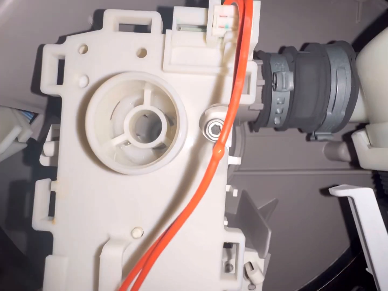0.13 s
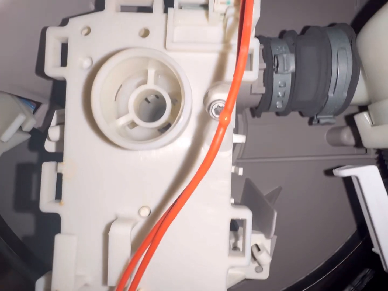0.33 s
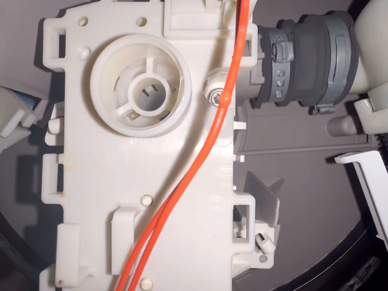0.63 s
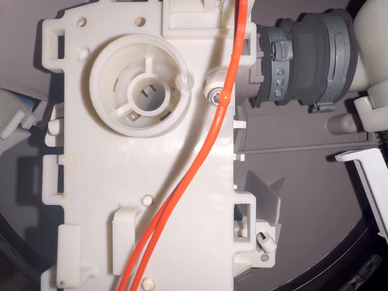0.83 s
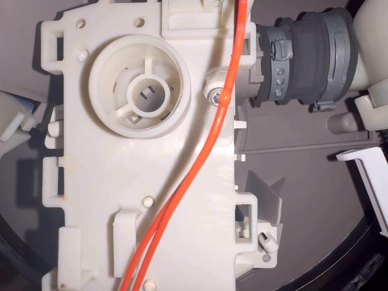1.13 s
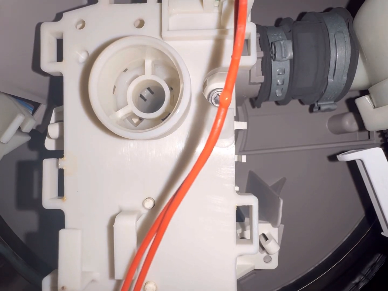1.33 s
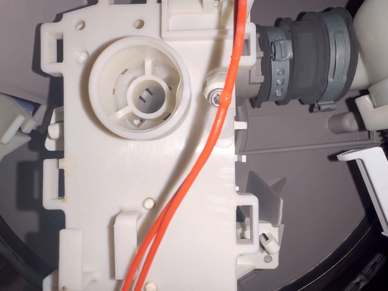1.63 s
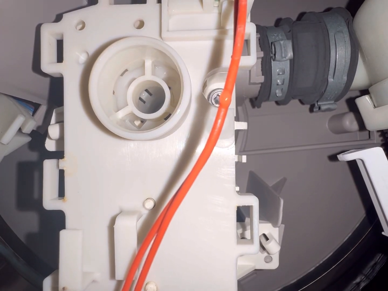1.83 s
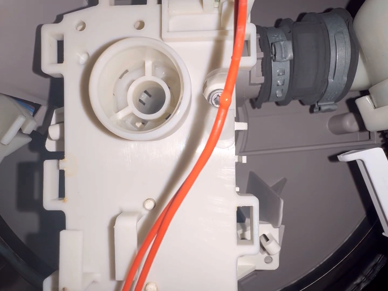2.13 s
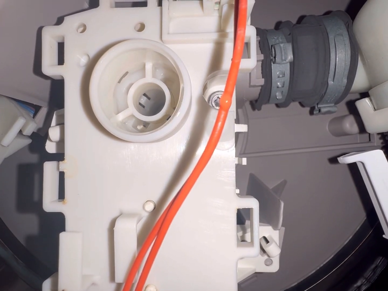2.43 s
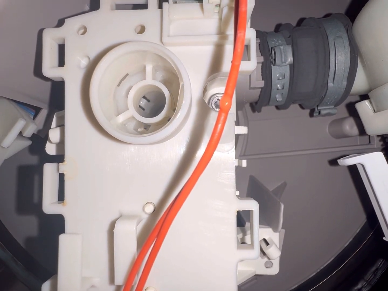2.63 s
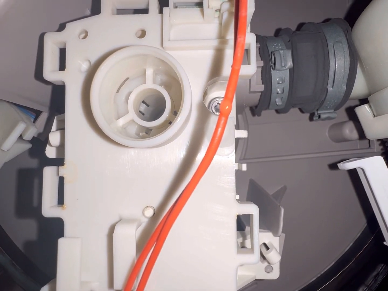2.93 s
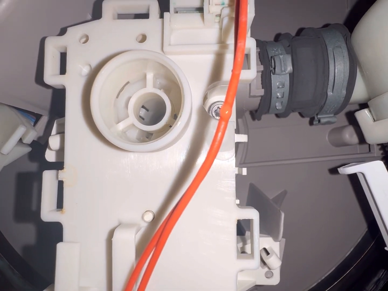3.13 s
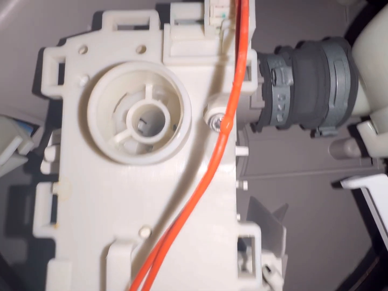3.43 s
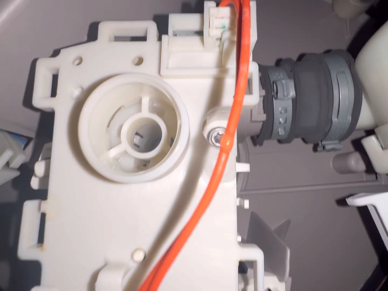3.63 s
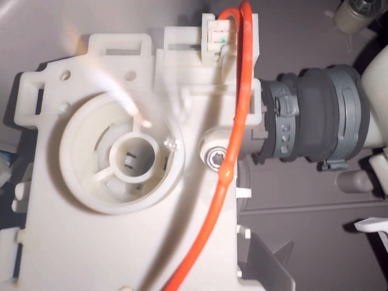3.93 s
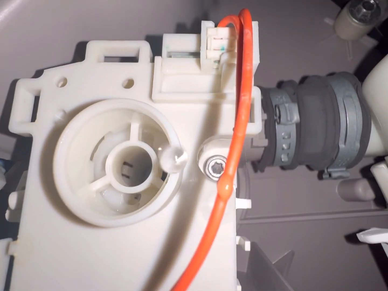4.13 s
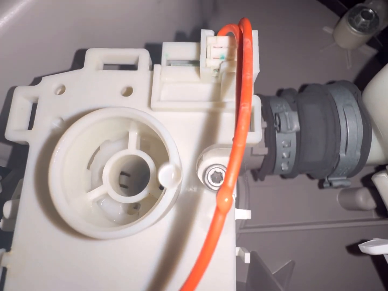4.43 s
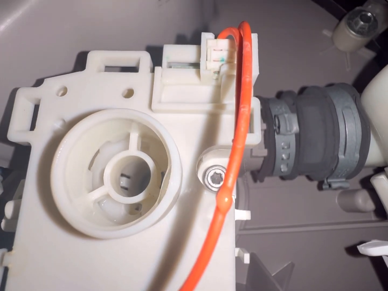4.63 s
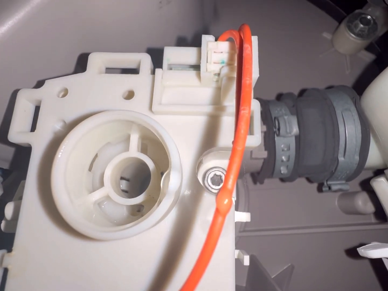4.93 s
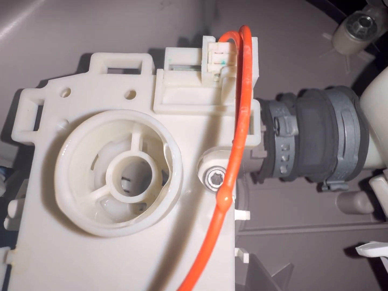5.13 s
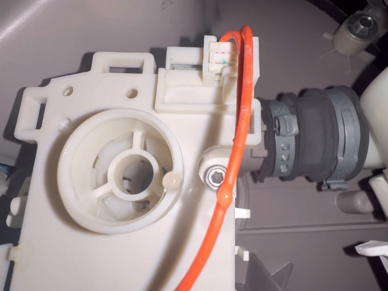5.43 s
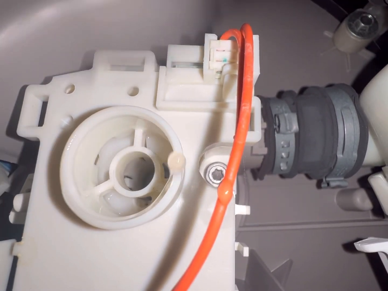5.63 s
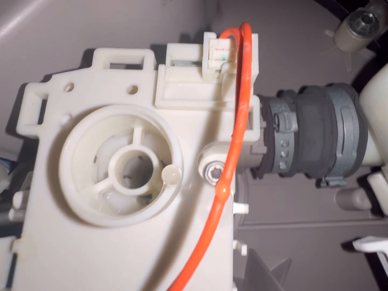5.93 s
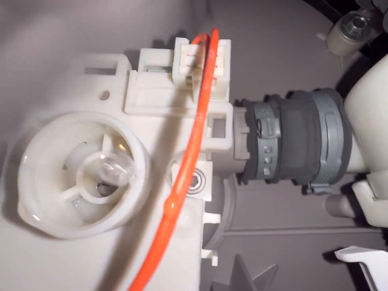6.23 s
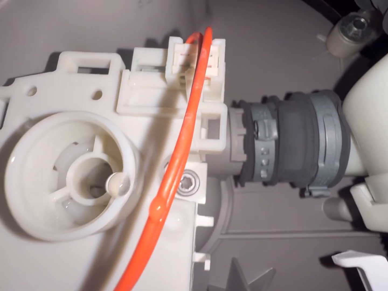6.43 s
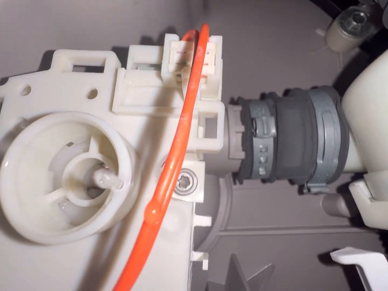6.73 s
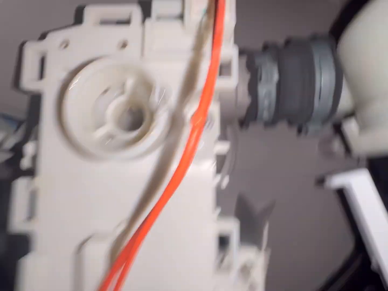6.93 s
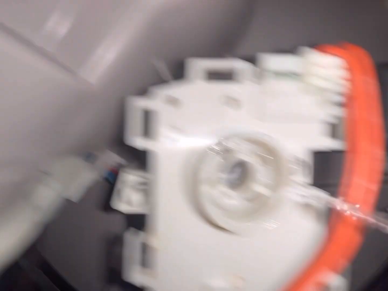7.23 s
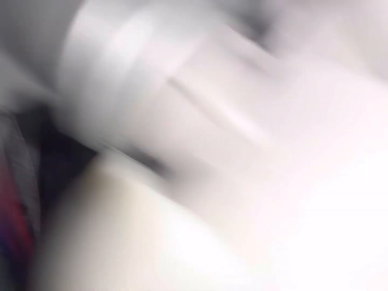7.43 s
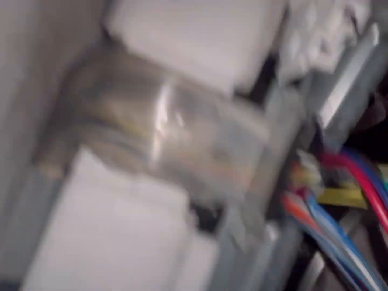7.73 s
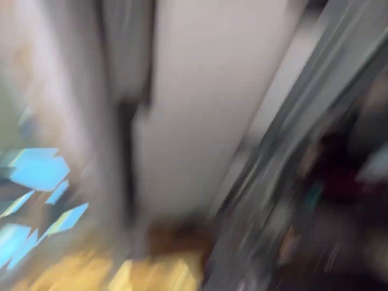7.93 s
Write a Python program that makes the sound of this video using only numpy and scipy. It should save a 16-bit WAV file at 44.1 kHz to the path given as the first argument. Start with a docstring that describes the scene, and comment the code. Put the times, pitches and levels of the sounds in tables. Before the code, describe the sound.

Very close under a dishwasher, in stereo with the right side louder and brighter. From 0 s a pump drones low, chirping and ticking about 47 times a second so it blurs into a rough buzz, with a grinding hiss, rumbling, gurgling water and a thin whistle around 5 kHz. At 1.84 s a drop strikes the phone with a hard ring and low thump, a small gurgle and plink following; another cracks at 2.93 s, dulling the buzz, with light plastic ticks to 3.5 s. The deep churning eases around 3.2-3.9 s, then returns. From 5.77 to 6.85 s drops pelt the microphone in clusters of heavy thumps, wet rings and sharp cracks, making the machine dip and recover. From about 7 s the phone slides out: a bump, gritty rubs, bright scrapes, rasps and ticks until 7.95 s, while the machine fades.

```python
"""Under a running dishwasher, with a phone as the stereo microphone; its right port hears the machine earlier.
The pump hums on multiples of its shaft speed and chirps once a turn; water is filtered noise, patchy in level.
A leaking valve drips onto the phone right beside the ports: rings, thumps and cracks that make the limiter
duck the machine, with gurgles of sliding noise. At the end the phone is pulled out, with grains of friction,
rasps, ticks and knocks, while the machine fades."""
import sys
import numpy as np
from scipy import signal
from scipy.fft import rfft, irfft, next_fast_len
from scipy.io import wavfile
from scipy.ndimage import uniform_filter1d, minimum_filter1d, map_coordinates

SR = 44100
rng = np.random.default_rng(int(sys.argv[2]) if len(sys.argv) > 2 else 0)


def bounce(signal):
    """Save signal as a 16-bit WAV file at the path given by the first command-line argument."""
    frames = np.transpose(np.atleast_2d(signal))
    limited = np.clip(frames, -1, 1)
    pcm = np.round(limited * 32767).astype(np.int16)
    wavfile.write(sys.argv[1], SR, pcm)


N = 356372

# Pump shaft. Each row: time in seconds, speed in turns per second.
SHAFT_SPEED = [(0, 46.6), (.5, 46.33), (1.2, 46.38), (1.7, 47.07), (2.1, 47.21), (2.9, 46.59),
               (4.05, 46.19), (4.5, 46.49), (6, 47.05), (6.5, 46.79), (7, 47.31)]
# How hard the water churns in the sump. Each row: time in seconds, level in dB.
CHURN = [(0, -1), (1.7, 0.5), (2.12, 2), (2.28, 1), (2.42, -7), (2.85, -6), (3.2, -15), (3.9, -14),
         (4.25, -4.5), (5.6, -0.5), (6.3, -10), (6.9, -11)]
HUM_PER_CHURN, GURGLE_PER_CHURN = 0.49, 0.4  # dB gained for each dB of churning; the first also lifts the vanes

# Motor hum. Each row: multiple of the shaft speed, relative level in dB.
HUM_ORDERS = [(1, -7.5), (2, -5), (4, -7), (12, -12), (13, -21)]
# Impeller tone and its side tones. Each row: multiple of the shaft speed, level in dB.
VANE_ORDERS = [(16, -11), (17, -1.5), (18, -1), (19, -3.5)]
VANE_ORDER = 18  # the centre tone
# Swell of the centre tone. Each row: time in seconds, gain in dB.
VANE_SWELL = [(0, 4), (.65, 6), (1.2, 9.5), (1.7, 5.5), (2.2, 1.5)]
ORDER_PHASE = np.pi / 2  # times order squared: the orders peak one after another, so the hum does not throb
CHIRP_DB, HUM_DB, VANES_DB = -31, -38.5, -36.5

# Housing's answer to the rub of each turn. Each row: frequency in Hz, level in dB per Hz.
CHIRP_SPECTRUM = [(1350, -91.5), (1480, -46.5), (1530, -10.5), (1580, 2), (1640, 5), (1720, 4), (1765, 5),
                  (1815, -5), (1900, -26.5), (2050, -30), (2600, -99)]
# Upper resonance of the chirp. Each row: frequency in Hz, level in dB per Hz.
OVERTONE_SPECTRUM = [(1650, -64), (1800, -12), (1860, -7), (1955, 2), (2040, 0.5), (2100, -5.5),
                     (2200, -15), (2500, -74)]
# Strength of that resonance, which changes with the place of the phone. Each row: time in seconds, level in dB.
OVERTONE_LEVEL = [(0, -43), (1.7, -39), (2.1, -47), (2.85, -47.5), (3.2, -35), (3.8, -35), (5.6, -33.5),
                  (7, -45)]
# Housing's answer to the tap of each turn. Each row: frequency in Hz, level in dB per Hz.
TAP_SPECTRUM = [(1700, -65), (2200, -8), (2480, 0.5), (2620, 13), (2780, -2), (2970, 1), (3300, -21),
                (4500, -62.5)]
# Brighter tick of each turn. Each row: frequency in Hz, level in dB per Hz.
TICK_SPECTRUM = [(2400, -43), (3200, -9), (3500, -14.5), (3850, 2), (4400, -14), (7000, -5.5), (10000, -84)]
TAP_PLACE, TICK_PLACE, CHIRP_PLACE = .61, .66, .735  # where they fall within a turn
TAP_DB, TICK_DB = -41, -40.5
TAP_ROUGH_DB = 1.6  # unevenness from turn to turn

# Grinding shaft seal. Each row: frequency in Hz, level in dB per Hz.
SEAL_SPECTRUM = [(1900, -63.5), (2130, 14.5), (2400, 1.5), (2640, -0.5), (2800, 2), (3000, -3.5),
                 (3250, -7.5), (3500, -3), (3900, -14.5), (4400, -13), (5900, 0), (6900, -10), (8000, -23),
                 (10000, -75)]
SEAL_DB = -38

# Water singing in a narrow gap of the pump. Each row: time in seconds, pitch in Hz, level in dB.
WHINE = [(0, 5160, -45), (.5, 5165, -38), (1.15, 5110, -34.5), (1.6, 5065, -38), (2.1, 5025, -47),
         (2.6, 5170, -32), (2.9, 5190, -39), (3.05, 5210, -40.5), (3.45, 5180, -38), (4.4, 5190, -52),
         (5.1, 4930, -47), (7, 4910, -53)]
# Higher, breathier band that comes and goes. Each row: time in seconds, pitch in Hz, level in dB.
HIGH_WHINE = [(2.9, 6950, -70), (3.2, 6990, -47.5), (3.55, 6700, -42.5), (4.2, 6650, -52), (4.7, 6700, -66),
              (6, 6780, -69.5)]
SKIRT_WIDTH_HZ, SKIRT_DB = 330, 2  # breathy skirt, dB over the clean core

# Deepest bass of the water. Each row: frequency in Hz, level in dB per Hz.
SLOSH_SPECTRUM = [(15, -19), (30, -8.5), (48, -0.5), (70, 1.5), (120, -39), (300, -120)]
# Low rumble of the water. Each row: frequency in Hz, level in dB per Hz.
RUMBLE_SPECTRUM = [(20, -39.5), (35, -22.5), (55, -7), (90, 0.5), (175, -1), (290, -9.5), (420, -17.5),
                   (700, -20), (1500, -63.5), (3000, -120)]
# Gurgling water, also the dull body of the ticks. Each row: frequency in Hz, level in dB per Hz.
GURGLE_SPECTRUM = [(100, -120), (250, -4), (450, -4), (600, 0.5), (720, -4), (920, -2.5), (1060, 3.5),
                   (1170, -3), (1270, -0.5), (1400, -5.5), (1800, 4), (2300, -10.5), (4000, -42),
                   (9000, -120)]
# Hiss at the impeller. Each row: frequency in Hz, level in dB per Hz.
HISS_SPECTRUM = [(600, -120), (1200, -17), (2100, 0.5), (2650, 1.5), (3000, 4), (3450, -5.5), (3850, 1.5),
                 (4350, -6), (5050, 6.5), (5600, 0.5), (6900, 2), (8000, -4), (9100, -19.5), (9700, -32),
                 (10600, -120)]
RUMBLE_DB, GURGLE_DB, HISS_DB = -31.5, -33, -32.5
HISS_PATCHY_DB = 1.2
SLOSH_DB, SLOSH_PER_CHURN = -37.5, 2.7  # the second in dB for each dB: deep bass comes with hard churning
SURGE_DB, SURGE_PLACE, SURGE_WIDTH = 3.5, .68, .08  # the hiss rises once a turn (dB, turns, turns)
SURGE_TOP_HZ = 4270  # the surge lies mostly below this

# Sizzle at the very top. Each row: frequency in Hz, level in dB per Hz.
SIZZLE_SPECTRUM = [(7000, -23), (8800, 11), (9500, 6), (10300, -66), (11100, -0.5), (12700, 8), (13000, -9),
                   (13400, -3), (14000, -39), (15100, -8), (16000, -49)]

# Films of water left over the port. Each row: start in seconds, then hum, middle and treble lost in dB.
FILMS = [(1.843, 4, -1.5, 0.5), (2.932, 2, 8.5, 7), (5.767, -8, 4, 1.5)]
CLEAR_S = 3.46  # the middle recovers by this decay time as the film thins; hum and treble stay changed
LEAVE_S, LEAVE_DB_PER_S = 6.89, 10.5  # the phone is pulled away and the machine fades
PUMP_LEAVE_DB_PER_S = 5.5  # extra fade of the pump, which falls behind faster than the water

# Drops landing on the phone, a heavy one often trailed by a soft one, and late knocks as it moves, made with
# the same ring and thump. Each row: start in seconds, level in dB, hardness from 0 to 1, ring in Hz,
# upper ring over the ring in dB, thump decay in seconds.
DROPS_AND_KNOCKS = [(1.8432, 3.5, 0.93, 1024, -11.5, 0.05), (2.04, -10, 0.75, 1230, -9, 0.031),
                    (2.054, -7.5, 0.62, 1290, 4, 0.017), (2.9323, -9, 0.93, 1200, -1.5, 0.041),
                    (5.7655, 5.5, 0.76, 1358, -32, 0.026), (5.8079, 9.5, 0.32, 1050, -9, 0.021),
                    (5.862, 1.5, 0.04, 1050, -12, 0.023), (5.978, -8.5, 0.08, 1050, -9, .015),
                    (5.989, 1.5, 0.16, 1050, -12, 0.029), (6.0409, 2.5, 0.72, 1046, -4, 0.015),
                    (6.0502, 2, .3, 1050, -5, 0.012), (6.071, 0, 0.46, 1180, -9, .016),
                    (6.079, -2, 0.51, 1050, -8, 0.044), (6.099, 0.5, 0.3, 1050, -9, 0.035),
                    (6.1522, 2.5, .69, 1105, -15, 0.0053), (6.1603, 0, 0.2, 1050, -9, 0.032),
                    (6.294, 5, 0.79, 1116, -8, 0.042), (6.3277, 0.5, 0.9, 998, -8, 0.037),
                    (6.3357, -9, 0.76, 1120, -12, 0.011), (6.388, -10, 0.4, 900, -12, 0.013),
                    (6.397, -12, .4, 900, -12, 0.028), (6.5373, 1, 0.69, 1060, -11.5, 0.008),
                    (6.5463, 4.5, .27, 1050, -9, 0.024), (6.5598, -8, 0.68, 966, -6, 0.014),
                    (6.7092, -4, 0.69, 1020, -8, 0.014), (6.7176, 2.5, 0.2, 1050, -9, 0.016),
                    (6.7373, -15.5, 0.9, 900, -6.5, 0.013), (6.7438, -9.5, 0.8, 1030, -6, 0.012),
                    (6.752, -12, 0.8, 1000, -9, 0.016), (6.77, -7.5, 0.71, 1010, -6, 0.016),
                    (6.8136, -1.5, 0.8, 960, -14, 0.014), (6.8226, 0, 0.2, 1050, -9, 0.027),
                    (6.9413, -20.5, 0.9, 1010, -7, .018), (6.985, -3.5, 0.66, 910, -12, 0.014),
                    (6.9912, -14.5, 0.79, 1060, -1, .02), (7.007, -10, 0.5, 1100, 7, 0.02),
                    (7.313, -13, 0.81, 1050, -5, 0.031), (7.358, -10.5, 0.06, 1050, -7, 0.021)]
RING_DB, RING_POWER = 17.5, 5.98  # ring over a drop's own level at full hardness; power of hardness it grows by
REST_HZ, HARD_HZ, SLACKEN_S = 54.1, 645, 0.017  # a thump starts higher by hardness and sinks to rest
THUMP_DB = -3.5
SOFT_ATTACK_S = 0.00085  # a soft hit presses slowly, a hard one faster
THUMP_SKEW = 0.055  # the port gives way more easily outwards than inwards
HOLLOW_HZ, HOLLOW_DB, HOLLOW_LIFE_S = 350.6, -11, .011  # the phone's body answers with a hollow note

# Narrow bands of noise with sliding pitch: watery gurgles and swishes among the drops, then rasps of the
# sliding phone. Each row: start in seconds, end in seconds, first pitch in Hz, last pitch in Hz, width in Hz,
# level in dB.
SLIDING_BANDS = [(1.99, 2.359, 1283, 1150, 330.7, -36), (6.09, 6.305, 942, 1130, 405, -37),
                 (6.89, 7.062, 1115, 1010, 305, -37), (7.057, 7.165, 5200, 5600, 920, -28),
                 (7.132, 7.31, 1146, 1027, 301, -28.5), (7.33, 7.422, 649, 569, 180, -21.5),
                 (7.402, 7.509, 6260, 7130, 1400, -24.5), (7.407, 7.499, 1500, 1880, 500, -30.5),
                 (7.485, 7.541, 1283, 1010, 400, -29), (7.56, 7.608, 542, 580, 250, -19),
                 (7.567, 7.698, 6220, 6540, 1930, -26.5), (7.58, 7.688, 1535, 1887, 505, -27.5),
                 (7.684, 7.717, 645, 510, 254, -24.5), (7.769, 7.833, 6300, 7000, 1296, -28),
                 (7.838, 7.874, 2945, 2360, 786, -20.5), (7.851, 7.962, 1795, 1030, 503, -44)]

# Small drops that plink nearby. Each row: start in seconds, pitch in Hz, level in dB.
PLINKS = [(2.239, 3250, -20.5), (5.163, 4630, -24), (5.872, 2950, -18.5), (6.18, 3070, -29.5)]
PLINK_LIFE_S = 0.004

# Sharp cracks of drops striking the port itself. Each row: start in seconds, level in dB,
# ring of the case over the crack in dB.
CRACKS = [(2.932, 5.5, -30), (6.295, 13, -20.5), (6.3269, 8.5, -2.5), (6.5366, 8.5, -32),
          (6.8131, 7, -12.5)]
CRACK_HZ, CRACK_LIFE_S = 1380, 0.00027
# Modes of the phone's case. Each row: frequency in Hz, relative level in dB, decay in seconds.
CASE_MODES = [(2160, 7, 0.00086), (2700, -9.5, 0.00082), (3560, 2, 0.0011), (5200, 2.5, 0.00085),
              (6650, -7, 0.0033)]

# Ticks and knocks on plastic. Each row: start in seconds, level in dB, dull body over that level in dB.
TICKS = [(3.054, -23, -2.5), (3.253, -26, -4), (3.3339, -6.5, -14), (3.463, -25, -15), (5.1392, -24, -17),
         (6.623, -14.5, -26), (6.7, -21, -10), (6.9712, -21.5, -11), (6.99, -20.5, -8), (7.3146, -18, 8.5),
         (7.3223, -24, -9.5), (7.5018, -14, 1), (7.5174, -29, 10.5), (7.7218, -21, -0.5), (7.7298, -17, 2),
         (7.7374, -16.5, 4), (7.7607, -17, -0.5), (7.8083, -19.5, -5), (7.924, -48, 6), (7.94, -47, 15),
         (7.949, -46.5, 14)]
# Modes of a small tapped plastic part. Each row: frequency in Hz, level in dB, time to fall 60 dB in seconds.
PLASTIC_MODES = [(1760, -5, 0.018), (2160, -2, 0.02), (2530, 3.5, 0.023), (3330, -4.5, 0.02),
                 (4426, -10, 0.02), (4770, -6, 0.016), (5160, -11, .018), (6950, 1.5, 0.023),
                 (7920, -3, 0.015)]
# Crunch of a tap on plastic. Each row: frequency in Hz, level in dB per Hz.
CRUNCH_SPECTRUM = [(300, -120), (900, -22), (1800, -6), (2550, -2.5), (2900, -18), (3350, -10.5),
                   (3900, -7.5), (4700, 0.5), (5800, -11), (6800, -1), (8000, -12), (9000, -24),
                   (11500, -120)]
CRUNCH_DB = -0.5  # over the level of the tick

# Strokes of the phone sliding out. Each row: start in seconds, end in seconds, rub in dB,
# bright scrape over the rub in dB, dull scuff over the rub in dB.
STROKES = [(6.984, 7.05, -36, -1, -14), (7.05, 7.152, -27.5, -6, -12), (7.15, 7.309, -32.5, -2, -13),
           (7.312, 7.345, -34.5, 5, 12), (7.335, 7.402, -33.5, 1.5, 2.5), (7.405, 7.522, -26, -3, -4.5),
           (7.525, 7.608, -30, -3, -1), (7.6, 7.703, -35, -5, -11), (7.712, 7.748, -30, 0, -6),
           (7.775, 7.806, -29.5, -4.5, -12), (7.841, 7.85, -27.5, -4.5, -12)]
STROKE_ATTACK_S, STROKE_RELEASE_S = 0.0048, 0.023
# Rub of the sliding phone. Each row: frequency in Hz, level in dB per Hz.
RUB_SPECTRUM = [(400, -120), (800, -4.5), (1080, -0.5), (1300, -1.5), (1750, -0.5), (2150, -3.5),
                (3200, -6.5), (3800, -17.5), (5000, -22), (9000, -120)]
# Bright scrape. Each row: frequency in Hz, level in dB per Hz.
SCRAPE_SPECTRUM = [(1500, -120), (3200, -10.5), (4200, -9), (5200, -4.5), (6900, -7), (7800, -15),
                   (9100, -24.5), (10600, -120)]
# Dull scuff, also the wet splat of the drops. Each row: frequency in Hz, level in dB per Hz.
SCUFF_SPECTRUM = [(80, -120), (200, -32), (400, -10.5), (580, 0), (760, -7), (1100, -12), (4000, -120)]
# Sharper catches in the rub. Each row: frequency in Hz, level in dB per Hz.
CRACKLE_SPECTRUM = [(300, -62), (600, -19), (1200, -1), (2000, 5), (3200, 0.5), (4000, -15), (5000, -4),
                    (7000, -5.5), (8500, -24), (10500, -89)]
FRICTION_GRAINS = 5000  # tiny slips a second, on average
CRACKLE_RATE, CRACKLE_DB = 420, -8  # catches a second on average, dB beside the rub

# Bumps against the tub as the phone starts to move. Each row: start in seconds, level in dB.
BUMPS = [(6.9867, -7.5), (7.311, -25)]
# Hollow ring of the tub. Each row: frequency in Hz, relative level in dB, decay in seconds.
TUB_MODES = [(220, -7.5, 0.012), (270, 11, 0.005), (378, 3, 0.0024)]

# Left port, facing away from the pump. Each row: frequency in Hz, left minus right in dB.
SHADE = [(60, -3.5), (200, 1), (500, -5.5), (830, -9), (1100, -1), (1700, -6), (2050, -1), (2550, -16),
         (3100, -3.5), (4200, -13), (7000, -16), (9000, -2.5), (10000, -2)]
# Likeness of left and right noise. Each row: frequency in Hz, correlation from -1 to 1.
ALIKE = [(60, 1), (1000, 0.083), (3000, 0.026), (7000, 0.034), (9000, 0.067), (10000, 0.25)]
# Later arrival at the left port. Each row: frequency in Hz, lag in seconds.
PORT_LAG = [(200, 0.00049), (500, 0.00073), (1050, 0.00077), (1700, 0.0006526)]
TOP_HZ = 16000  # the phone keeps nothing above


def amp(db):
    """Decibels to gain."""
    return np.exp(np.asarray(db) * (np.log(10) / 20))


def unit(x):
    """Scale to rms 1."""
    return x / np.sqrt(np.mean(x ** 2) + 1e-20)


def along(points, hz):
    """Read (Hz, value) points on a log frequency axis."""
    f, v = np.transpose(points)
    return np.interp(np.log(hz + 1), np.log(f + 1), v)


def clock():
    """Time of every sample in seconds."""
    return np.arange(N) / SR


def curves(rows):
    """One value per sample for each column after the time."""
    s, *columns = np.transpose(rows)
    return [np.interp(clock(), s, column) for column in columns]


def wobble(rate):
    """A smooth random curve with rate knots a second."""
    steps = np.arange(0, N * rate / SR + 1, 1 / 8)
    knots = rng.standard_normal(int(steps[-1]) + 4)
    return np.interp(clock() * rate, steps, map_coordinates(knots, [steps]))


def filtered(x, response):
    """Filter x by a complex response of frequency."""
    m = next_fast_len(N + SR // 4)
    return irfft(rfft(x, m) * response(np.fft.rfftfreq(m, 1 / SR)), m)[..., :N]


def shaped(x, spectrum):
    """Filter x by a spectrum given in dB."""
    return filtered(x, lambda hz: amp(along(spectrum, hz)))


def add(track, s, sound):
    """Mix a sound into a track at time s."""
    part = track[..., round(s * SR):][..., :sound.shape[-1]]
    part += sound[..., :part.shape[-1]]


def coloured(pair, spectrum):
    """Turn two unrelated signals into a partly alike stereo pair with this spectrum, rms 1."""
    def mid_side(hz):
        likeness = np.clip(along(ALIKE, hz), -1, 1)
        return amp(along(spectrum, hz)) * np.sqrt((1 + np.outer([1, -1], likeness)) / 2)

    mid, side = filtered(pair, mid_side)
    return unit(np.array([mid + side, mid - side]))


def rush(spectrum, patchy_db):
    """Turbulence: stereo noise of rms 1 with patches of random gain in time and frequency."""
    z = signal.stft(rng.standard_normal((2, N)), nperseg=512)[2]
    patches = uniform_filter1d(rng.standard_normal(z.shape[1:]), size=5, axis=0)
    patches = uniform_filter1d(patches, size=8, axis=1)
    noise = signal.istft(z * amp(patchy_db * unit(patches)), nperseg=512)[1][:, :N]
    return coloured(noise, spectrum)


def grains(spectrum, rate, spread_db):
    """Friction as tiny random impacts of uneven size, rms 1."""
    size = amp(spread_db * np.clip(rng.standard_normal(N), -2, 2))
    hits = (rng.random(N) < rate / SR) * size
    return coloured(hits * rng.standard_normal((2, N)), spectrum)


def pulses(turns, place, spectrum, rough_db):
    """One pulse of uneven size at the same place in every turn, coloured by the housing; rms 1."""
    at = np.interp(np.arange(int(turns[-1]) - 1) + place, turns, np.arange(N))
    near = at.astype(int)[:, None] + np.arange(-8, 8)
    size = amp(rough_db * rng.standard_normal((len(at), 1)))
    taps = size * np.sinc(near - at[:, None])  # places each pulse between samples
    train = np.bincount(np.clip(near, 0, N - 1).ravel(), taps.ravel(), N)
    return unit(shaped(train, spectrum))


def tones(turns, orders):
    """One sine, slightly unsteady in level, for each multiple of the shaft speed."""
    out = {}
    for order, db in orders:
        phase = 2 * np.pi * round(order) * turns + ORDER_PHASE * order ** 2
        out[round(order)] = amp(db + 0.71 * wobble(2.4)) * np.cos(phase)
    return out


def pump(turns, churn_db, hum_lost, middle_lost):
    """The rotor hums on its low orders and sings on its vanes; in each turn it taps, ticks and rubs with a chirp."""
    (swell_db,), (overtone_db,) = curves(VANE_SWELL), curves(OVERTONE_LEVEL)
    chirp = amp(CHIRP_DB) * pulses(turns, CHIRP_PLACE, CHIRP_SPECTRUM, rough_db=0.67)
    tap = amp(TAP_DB) * pulses(turns, TAP_PLACE, TAP_SPECTRUM, rough_db=TAP_ROUGH_DB)
    tick = amp(TICK_DB) * pulses(turns, TICK_PLACE, TICK_SPECTRUM, rough_db=TAP_ROUGH_DB)
    overtone = pulses(turns, CHIRP_PLACE, OVERTONE_SPECTRUM, rough_db=0.5)
    overtone = overtone + amp(-8.5) * pulses(turns, .3, OVERTONE_SPECTRUM, rough_db=0.5)  # weaker second pulse
    rubbing = chirp + tap + tick + amp(overtone_db) * unit(overtone)
    hum = amp(HUM_DB - hum_lost) * unit(sum(tones(turns, HUM_ORDERS).values()))
    vanes = tones(turns, VANE_ORDERS)
    vanes[VANE_ORDER] = amp(swell_db) * vanes[VANE_ORDER]
    singing = amp(VANES_DB) * sum(vanes.values())
    return amp(-middle_lost) * rubbing + amp(HUM_PER_CHURN * churn_db) * (hum + singing)


def seal(turns):
    """The shaft seal grinds over the same roughness in every turn: a fine, steady buzz of rms 1."""
    face = rng.standard_normal(800)
    rough = map_coordinates(face, [turns % 1 * len(face)], mode="grid-wrap")
    return unit(shaped(rough, SEAL_SPECTRUM))


def narrow(hz, width_hz):
    """A band of noise of rms 1 around a moving pitch."""
    phase = 2 * np.pi * np.cumsum(hz) / SR
    return unit(wobble(width_hz) * np.cos(phase) + wobble(width_hz) * np.sin(phase))


def whine():
    """Water singing in a gap: a thin wavering whistle with a breathy skirt, drifting in pitch and strength."""
    (hz, db), (high_hz, high_db) = curves(WHINE), curves(HIGH_WHINE)
    phase = 2 * np.pi * np.cumsum(hz + 9 * wobble(25)) / SR
    core = amp(1.9 * wobble(15)) * np.sin(phase)
    whistle = unit(unit(core) + amp(SKIRT_DB) * narrow(hz, SKIRT_WIDTH_HZ))
    return amp(db) * whistle + amp(high_db) * narrow(high_hz, width_hz=800)


def water(turns, churn_db, gurgle_lost, treble_lost):
    """Water sloshes and rumbles in the sump, gurgles in the hoses and hisses at the impeller, harder once a turn."""
    slosh_db = SLOSH_DB + SLOSH_PER_CHURN * churn_db + 1.8 * wobble(9.3)
    rumble_db = RUMBLE_DB + churn_db + 0.42 * wobble(14)
    gurgle_db = GURGLE_DB + GURGLE_PER_CHURN * churn_db - gurgle_lost + 1.45 * wobble(25)
    slosh = amp(slosh_db) * rush(SLOSH_SPECTRUM, patchy_db=0.0)
    rumble = amp(rumble_db) * rush(RUMBLE_SPECTRUM, patchy_db=2.5)
    gurgle = amp(gurgle_db) * rush(GURGLE_SPECTRUM, patchy_db=1.0)
    from_surge = (turns - SURGE_PLACE + .5) % 1 - .5  # turns from the nearest surge
    surge = amp(SURGE_DB * np.exp(-.5 * (from_surge / SURGE_WIDTH) ** 2))
    hiss = rush(HISS_SPECTRUM, patchy_db=HISS_PATCHY_DB)
    hiss = hiss + filtered((surge - 1) * hiss, lambda hz: 1 / (1 + (hz / SURGE_TOP_HZ) ** 10))
    return slosh + rumble + gurgle + amp(HISS_DB - treble_lost) * hiss


def wet_port():
    """dB lost in the hum, the middle and the treble under the films of water; a negative loss is a gain."""
    t, lost = clock(), np.zeros((3, N))
    for s, hum_db, middle_db, treble_db in FILMS:
        on = t > s
        thinning = np.exp(-np.abs(t - s) / CLEAR_S)
        lost += [on * hum_db, on * middle_db * thinning, on * treble_db]
    return lost


def machine():
    """Pump and water run on one shaft clock, coloured by the wet port and fading as the phone leaves."""
    (speed,), (churn_db,) = curves(SHAFT_SPEED), curves(CHURN)
    turns = np.cumsum(speed) / SR
    hum_lost, middle_lost, treble_lost = wet_port()
    away_s = np.maximum(clock() - LEAVE_S, 0)
    gurgle_lost = 0.098 * hum_lost + 0.53 * middle_lost  # the gurgle lies between the two bands
    motor = pump(turns, churn_db, hum_lost, middle_lost)
    motor = motor + amp(SEAL_DB - treble_lost) * seal(turns) + whine()
    receding = amp(-PUMP_LEAVE_DB_PER_S * away_s) * motor
    return amp(-LEAVE_DB_PER_S * away_s) * (receding + water(turns, churn_db, gurgle_lost, treble_lost))


def sizzle():
    """Two thin wavering sines and patchy noise at the very top, heard until the first drop lands."""
    whistle = np.zeros(N)
    for hz, db in [(12247, -62), (12527, -64)]:
        whistle += amp(db + 2.6 * wobble(3)) * np.sin(2 * np.pi * hz * clock() + .5 * wobble(14.5))
    before_drops = clock() < DROPS_AND_KNOCKS[0][0]
    return before_drops * (whistle + amp(-48.0) * rush(SIZZLE_SPECTRUM, patchy_db=2.5))


def drops_and_knocks():
    """A hard hit slaps the case with a short hollow knock and rings two modes of the wet port for a few cycles."""
    t = np.arange(SR // 25) / SR
    decay = np.exp(-(t / 0.0025) ** 2) + 0.074 * np.exp(-t / 0.0065)
    swell = (1 - np.exp(-t / 0.00062)) ** 2 * decay
    knock = 0.25 * np.sin(2 * np.pi * 760 * t) * np.exp(-t / 0.0032)
    knock = knock + 0.062 * np.sin(2 * np.pi * 330 * t) * np.exp(-t / 0.008)
    knock = knock * (1 - np.exp(-t / 0.00013))
    ring, slap = np.zeros((2, N))
    for s, db, hardness, hz, upper_db, _ in DROPS_AND_KNOCKS:
        size = amp(db + RING_DB) * np.clip(hardness, 0, 1) ** RING_POWER
        modes = np.sin(2 * np.pi * hz * t) + amp(upper_db) * np.sin(2 * np.pi * 1400 * t)
        add(ring, s, size * swell * modes)
        add(slap, s + 0.00083, size * knock)
    return ring * amp([[-2], [0]]) + slap * amp([[-9], [0]])  # dB left, right


def thumps():
    """Each drop or knock pushes the port: a low swing of lengthening period, a hollow note and a brief splat."""
    t = np.arange(SR // 6) / SR
    push, splat = np.zeros((2, N))
    for s, db, hardness, _, _, life in DROPS_AND_KNOCKS:
        attack_s = SOFT_ATTACK_S * np.clip(1 - hardness, .1, 1)
        swing = (1 - np.exp(-t / attack_s)) * np.exp(-(t / life) ** 2)
        start_hz = REST_HZ + HARD_HZ * np.clip(hardness, 0, 1)
        period = 1 / REST_HZ + (1 / start_hz - 1 / REST_HZ) * np.exp(-t / SLACKEN_S)
        phase = 2 * np.pi * np.cumsum(1 / period) / SR
        skewed = np.sin(phase) - THUMP_SKEW * swing * np.cos(2 * phase)
        add(push, s + 0.00094, amp(db + THUMP_DB) * swing * skewed)
        hollow_hz = HOLLOW_HZ * (1 + .07 * rng.standard_normal())
        hollow = np.exp(-t / HOLLOW_LIFE_S) * np.sin(2 * np.pi * hollow_hz * t)
        add(push, s + .002, amp(db + HOLLOW_DB) * hardness * hollow)
        add(splat, s, amp(db - 19.0) * hardness * np.exp(-t / 0.011))
    splat = splat * unit(shaped(rng.standard_normal(N), SCUFF_SPECTRUM))
    splat = filtered(splat, lambda hz: 1 / (1 + 1j * hz / 600) ** 2)
    return (push + splat) * amp([[-13], [0]])  # far stronger at the right port


def sliding_bands():
    """Narrow bands of noise with sliding pitch: gurgles and swishes among the drops, then rasps of the phone."""
    out = np.zeros(N)
    for start, end, from_hz, to_hz, width_hz, db in SLIDING_BANDS:
        u = np.linspace(0, 1, max(round((end - start) * SR), 2))
        knots = int(len(u) * width_hz / SR) + 2
        jitter = unit(np.interp(u, np.linspace(0, 1, knots), rng.standard_normal(knots)))
        tone = np.sin(2 * np.pi * np.cumsum(from_hz + (to_hz - from_hz) * u) / SR)
        add(out, start, amp(db) * np.sin(np.pi * u) * jitter * tone)
    return filtered(out, lambda hz: 1 / (1 + (hz / 8500) ** 30))


def plinks():
    """Each small drop rings one short note."""
    t, out = np.arange(SR // 20) / SR, np.zeros(N)
    shape = (1 - np.exp(-t / 0.00086)) * np.exp(-t / PLINK_LIFE_S)
    for s, hz, db in PLINKS:
        add(out, s, amp(db) * shape * np.sin(2 * np.pi * hz * t))
    return out


def cracks():
    """A direct hit on the port is one sharp swing of pressure that also rings the case, by its own amount."""
    t, out = np.arange(SR // 50) / SR, np.zeros(N)
    spike = np.sin(2 * np.pi * CRACK_HZ * t) * np.exp(-t / CRACK_LIFE_S)
    case = sum(amp(db) * np.sin(2 * np.pi * hz * t) * np.exp(-t / life) for hz, db, life in CASE_MODES)
    case = case * (1 - np.exp(-t / 0.00014))
    for s, db, case_db in CRACKS:
        add(out, s, amp(db) * (spike + amp(case_db) * case))
    return filtered(out, lambda hz: 1 / (1 + 1j * hz / 11000) ** 2) * amp([[-7], [0]])


def ticks():
    """Short taps ring the modes of the plastic over a little noisy crunch, each with some dull body."""
    t = np.arange(SR // 20) / SR
    shape = (1 - np.exp(-t / 0.0013)) * amp(-60 * t / 0.026)
    bright, dull, ring = np.zeros((3, N))
    for s, db, body_db in TICKS:
        modes = np.zeros(len(t))
        for hz, level, t60 in PLASTIC_MODES:
            decay = amp(level + rng.normal(0, 2.1) - 60 * t / t60)
            modes += decay * np.sin(2 * np.pi * (hz * t + rng.random()))
        add(ring, s, amp(db - 4) * (1 - np.exp(-t / 0.00062)) * modes)
        add(bright, s, amp(db + CRUNCH_DB) * shape)
        add(dull, s, amp(db + body_db) * shape)
    crunch = bright * coloured(rng.standard_normal((2, N)), CRUNCH_SPECTRUM)
    body = amp(3.0) * dull * coloured(rng.standard_normal((2, N)), GURGLE_SPECTRUM)
    return ring + crunch + body


def handling():
    """Stick-slip grains as the phone slides out from under the machine; each stroke rises, holds and dies away."""
    t, level = clock(), np.zeros((3, N))
    for start, end, db, scrape_db, scuff_db in STROKES:
        shape = np.clip((t - start) / STROKE_ATTACK_S, 0, 1)
        shape = shape * np.exp(-np.maximum(t - end, 0) / STROKE_RELEASE_S)
        level = np.maximum(level, np.outer(amp([db, db + scrape_db, db + scuff_db]), shape))
    rub = level[0] * grains(RUB_SPECTRUM, rate=FRICTION_GRAINS, spread_db=3)
    scrape = level[1] * rush(SCRAPE_SPECTRUM, patchy_db=3)
    scuff = level[2] * grains(SCUFF_SPECTRUM, rate=2100, spread_db=0.0)
    crackle = level[0] * amp(CRACKLE_DB) * grains(CRACKLE_SPECTRUM, rate=CRACKLE_RATE, spread_db=4.5)
    return amp(2.43 * wobble(45)) * (amp(-0.5) * rub + scrape + scuff + crackle)


def bumps():
    """A soft contact rings the tub's modes for a few cycles."""
    t, out = np.arange(SR // 10) / SR, np.zeros(N)
    ring = sum(amp(db) * np.sin(2 * np.pi * hz * t) * np.exp(-t / life) for hz, db, life in TUB_MODES)
    ring = (1 - np.exp(-t / 0.00054)) * ring
    for s, db in BUMPS:
        add(out, s, amp(db) * ring)
    return out * amp([[-9], [0]])


def scene():
    """Sounds around the phone are shaded at the left port, contacts on it keep their own balance; left lags."""
    around = machine() + ticks() + plinks() + handling() + sliding_bands()
    shaded = filtered(around, lambda hz: np.array([amp(along(SHADE, hz)), np.ones_like(hz)]))
    left, right = shaded + drops_and_knocks() + cracks() + thumps() + bumps()
    late_left = filtered(left, lambda hz: np.exp(-2j * np.pi * hz * along(PORT_LAG, hz)))
    return np.array([late_left, right]) + sizzle()


def limiter(x, ceiling_db, hold, release_db):
    """Peaks pull the gain down at once; it holds for hold seconds, then climbs back at release_db a second."""
    need = np.minimum(ceiling_db - 20 * np.log10(np.abs(x).max(axis=0) + 1e-9), 0)
    half, ahead = int(hold * SR / 2), SR // 400
    held = minimum_filter1d(need, 2 * half + 1, origin=half)
    climb = release_db * clock()
    gain_db = np.minimum.accumulate(held - climb) + climb
    early = minimum_filter1d(gain_db, 2 * ahead)  # a short look ahead, then smoothed
    return x * amp(uniform_filter1d(early, 2 * ahead))


def record(dry):
    """The phone limits the peaks and keeps nothing above its band."""
    limited = limiter(dry, ceiling_db=0.36, hold=0.079, release_db=82.0)
    return filtered(limited, lambda hz: hz < TOP_HZ)


dry = scene()
out = record(dry)
bounce(out)
```